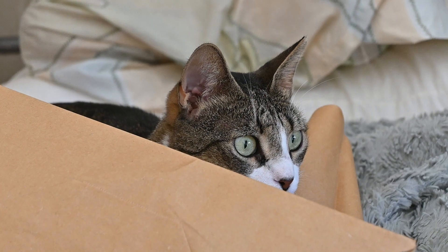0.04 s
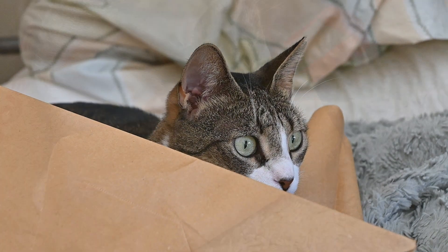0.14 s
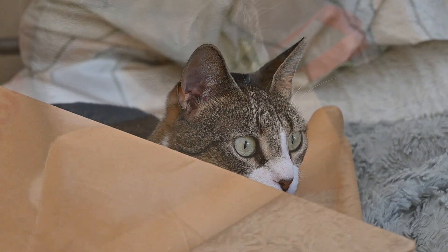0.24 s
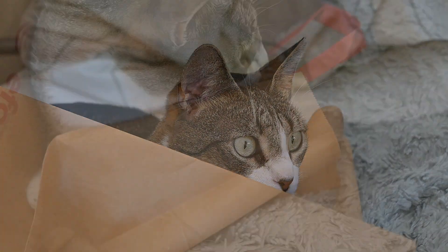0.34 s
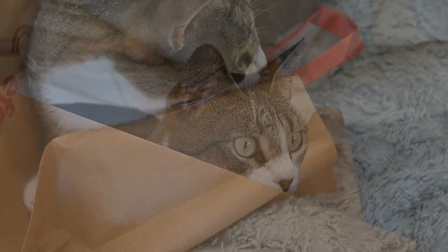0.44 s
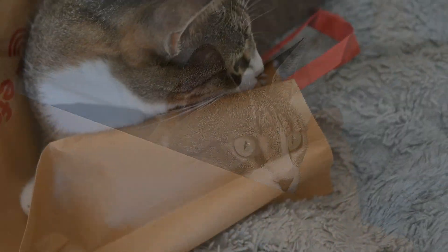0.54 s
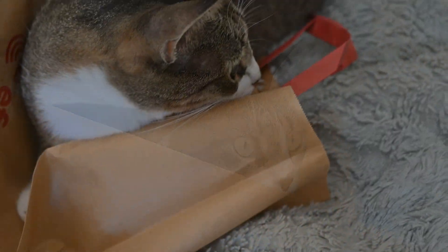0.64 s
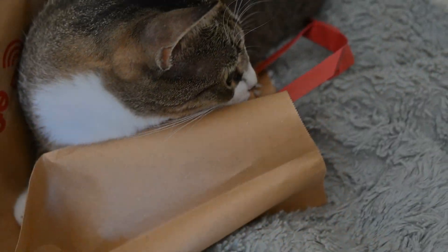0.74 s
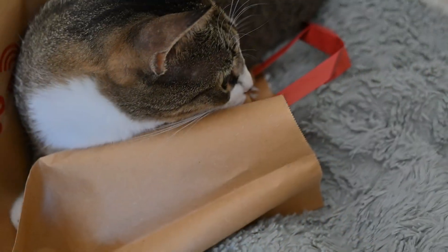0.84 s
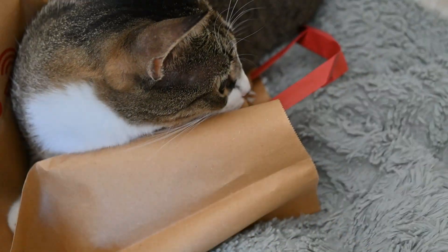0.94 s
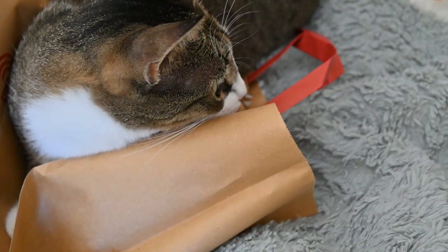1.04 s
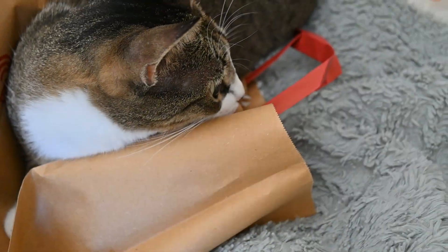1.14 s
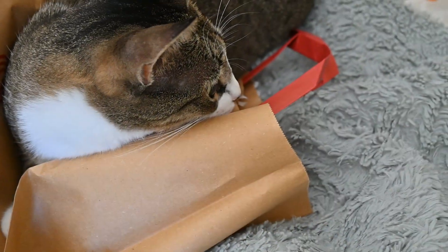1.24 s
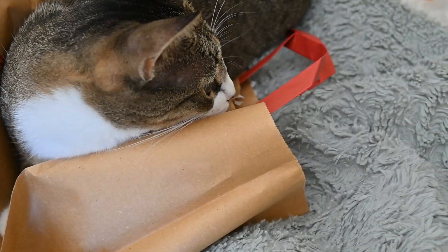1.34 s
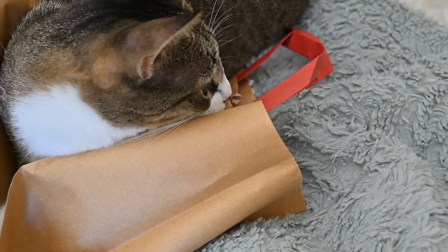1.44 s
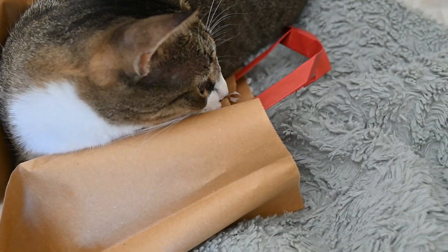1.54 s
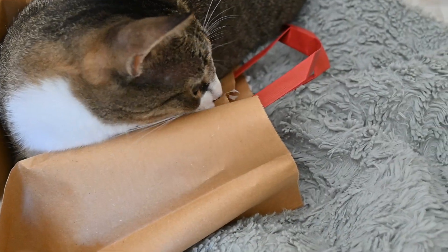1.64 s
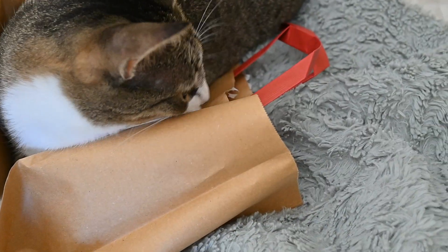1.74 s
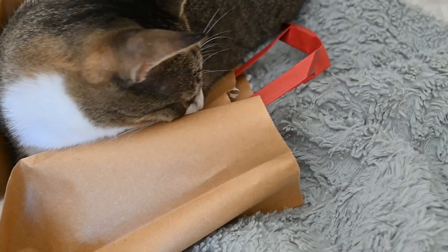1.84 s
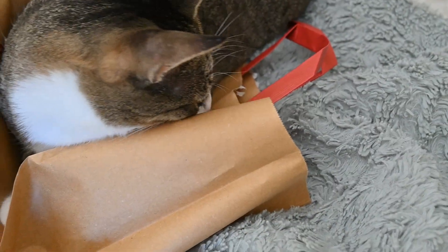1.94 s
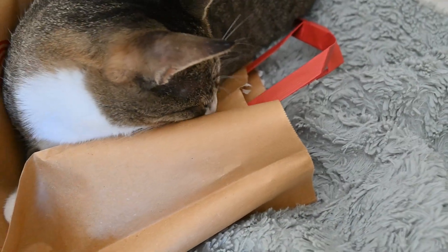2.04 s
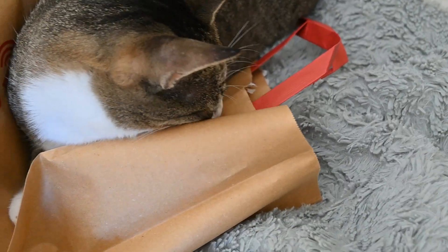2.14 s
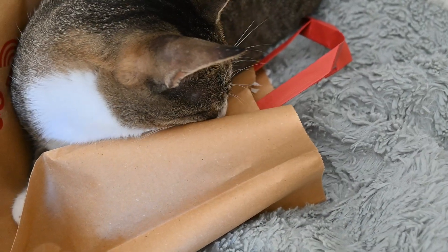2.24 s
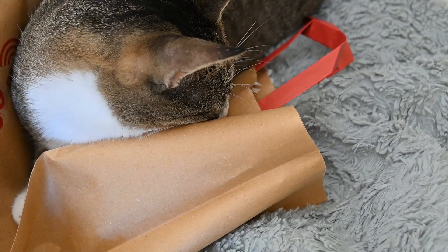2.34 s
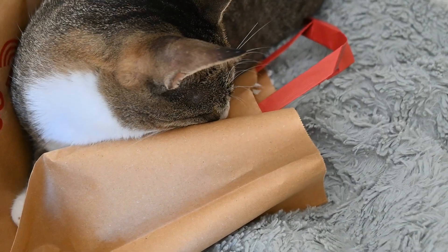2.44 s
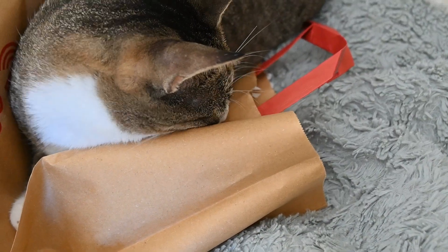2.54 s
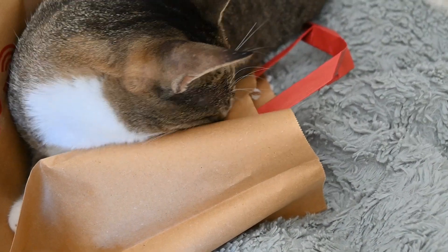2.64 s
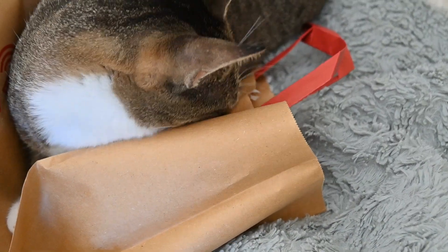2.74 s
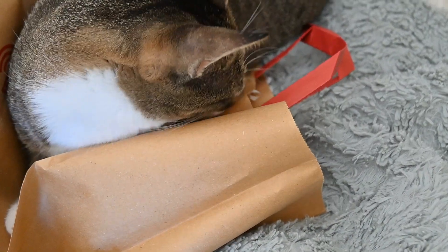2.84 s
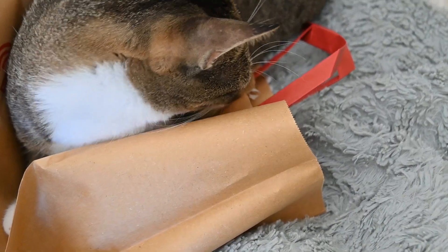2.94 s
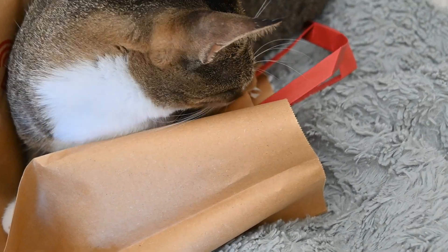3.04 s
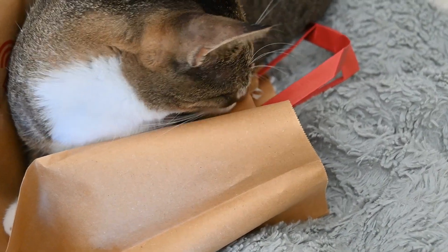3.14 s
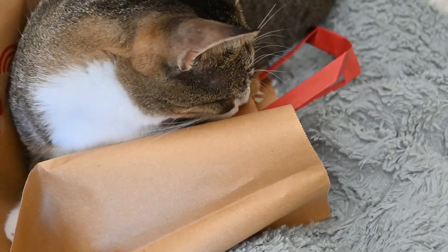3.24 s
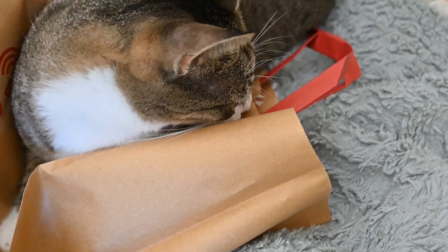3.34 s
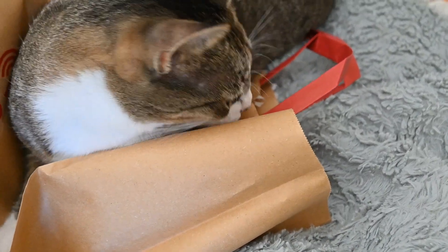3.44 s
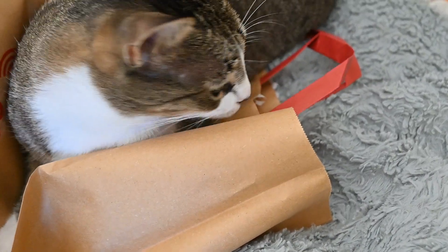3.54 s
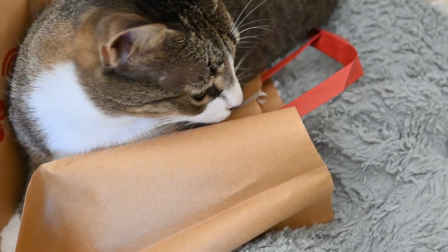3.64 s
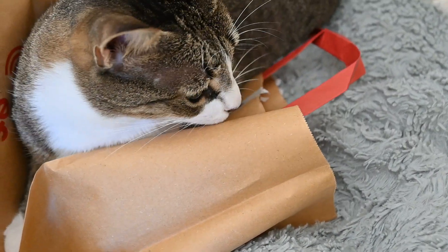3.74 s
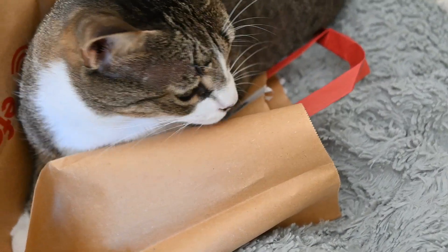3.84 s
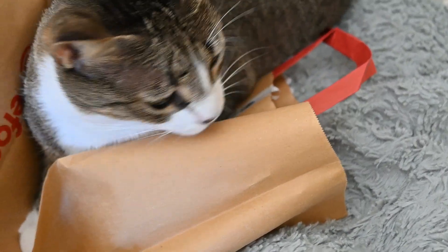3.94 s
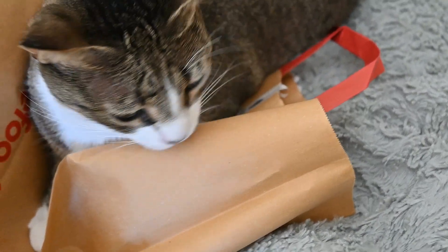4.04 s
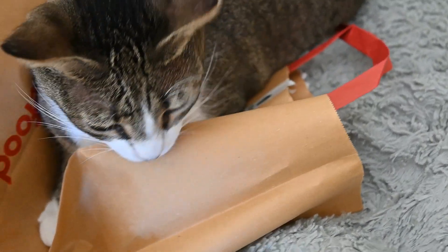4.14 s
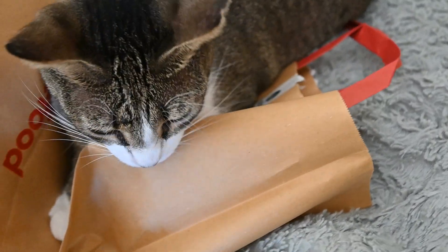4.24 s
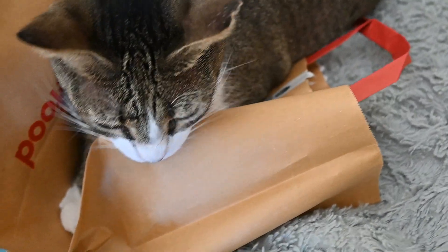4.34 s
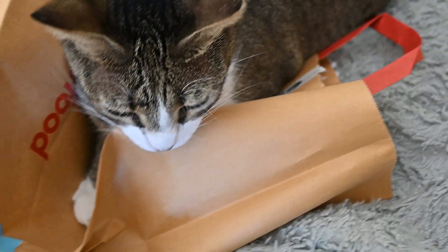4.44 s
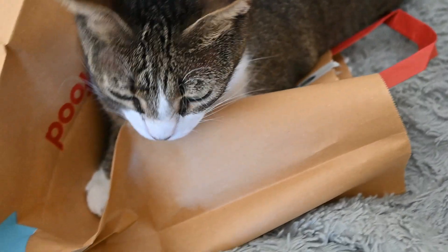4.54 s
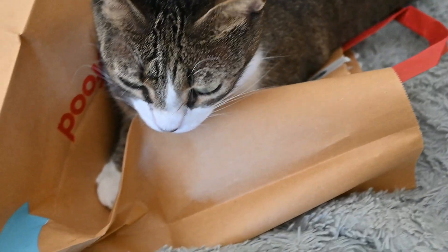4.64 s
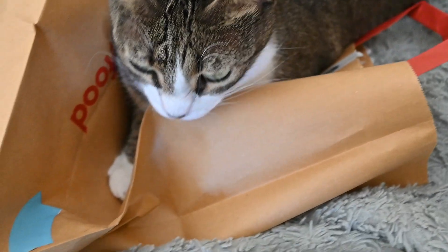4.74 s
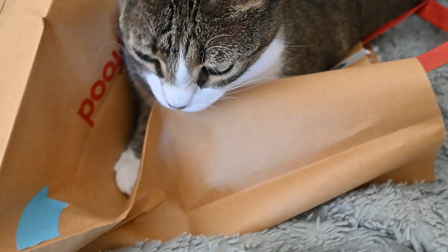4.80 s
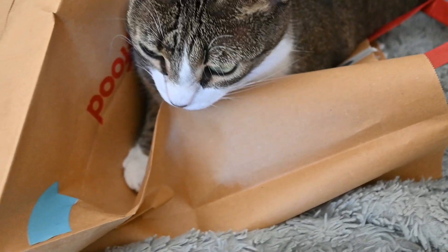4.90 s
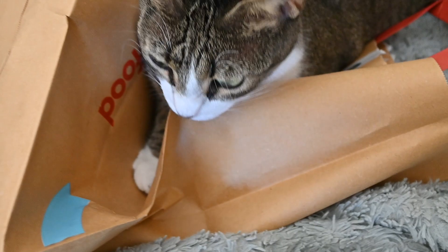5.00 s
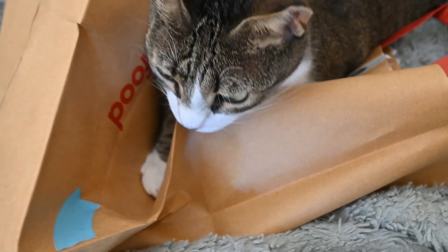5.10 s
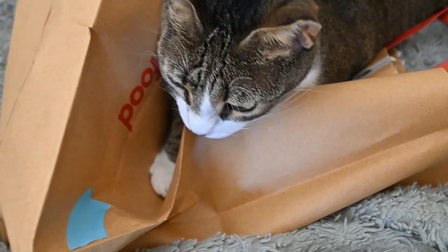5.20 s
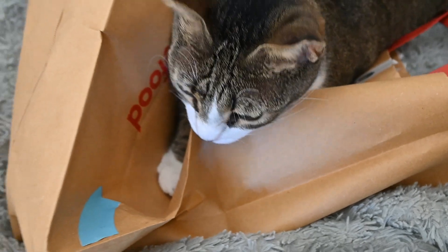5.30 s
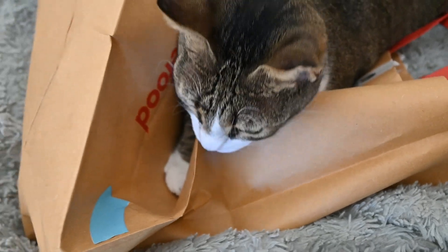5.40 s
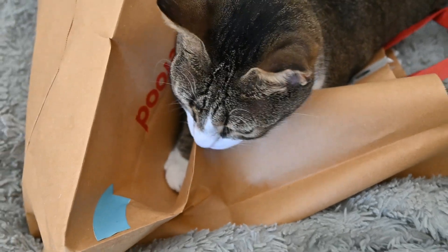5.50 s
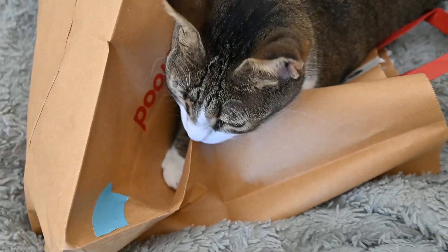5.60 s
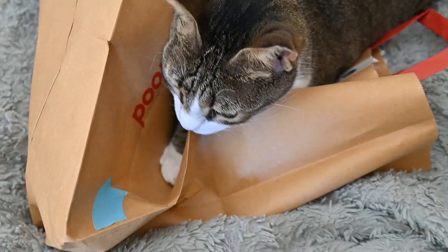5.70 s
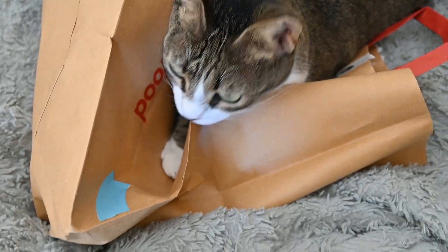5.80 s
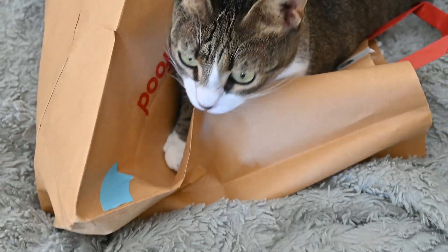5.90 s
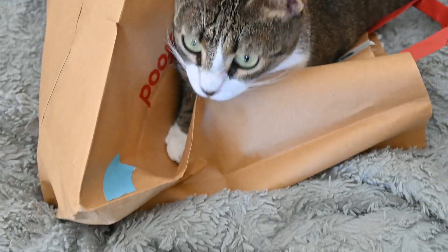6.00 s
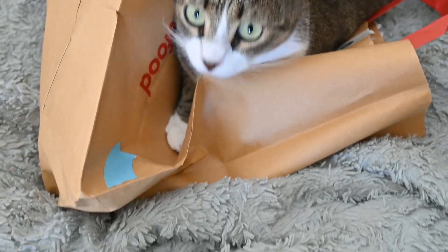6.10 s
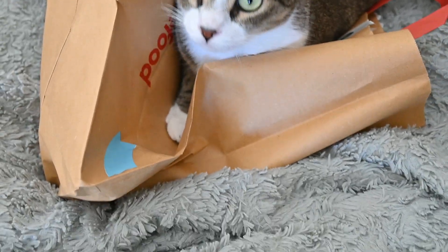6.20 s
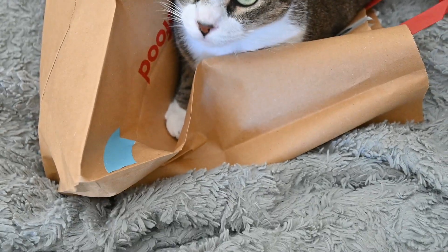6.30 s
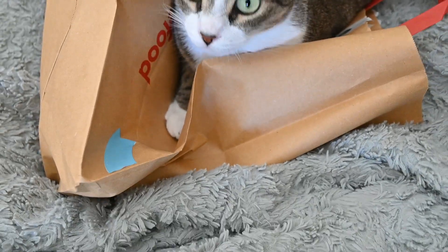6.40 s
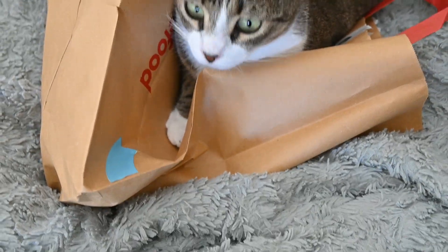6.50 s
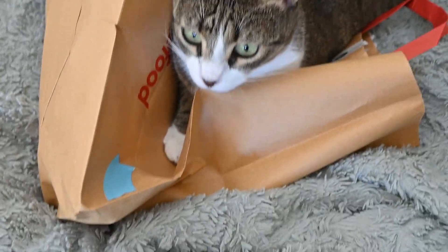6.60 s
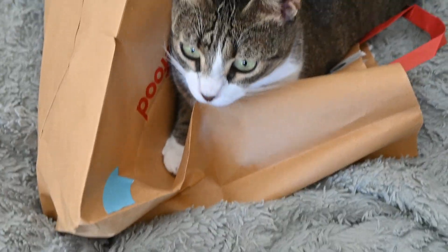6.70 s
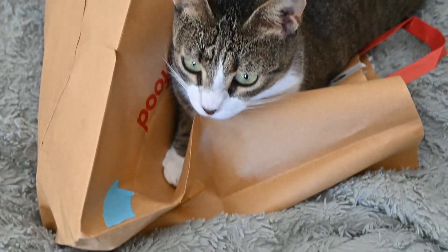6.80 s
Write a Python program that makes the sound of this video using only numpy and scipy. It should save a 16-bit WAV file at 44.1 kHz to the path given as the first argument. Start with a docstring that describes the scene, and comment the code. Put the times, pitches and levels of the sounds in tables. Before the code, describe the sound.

Close to a small camera's microphones, a paper bag on a thick blanket rustles softly, then buckles with irregular dry snaps and papery scraping. The loudest crackling comes just past the middle, with a dull thump of air in the bag. It thins to isolated ticks; a faint low house hum grows beneath steady hiss in the quiet room.

```python
"""Fur slides softly on paper at first; throughout, a low rumble, a faint hum that grows towards the end, and
capsule hiss. A cat shifts its weight on a stiff paper bag on a thick blanket, in a quiet, dry room, close to
the two capsules of a small camera. Creases buckle with snaps and dull pops: noise and kicks through resonances,
with a short room tail. The rustle is coloured, grainy noise that follows each stroke; the bag's air thumps as
filtered pulses. A brief thin whistle is narrow-band noise; rumble and hiss are shaped noise, the hum sines."""
import sys
import numpy as np
from scipy import signal
from scipy.fft import rfft, irfft, next_fast_len
from scipy.io import wavfile
from scipy.ndimage import uniform_filter1d, map_coordinates

SR = 44100
rng = np.random.default_rng(int(sys.argv[2]) if len(sys.argv) > 2 else 0)


def transcribe(u):
    """Save the signal u as a 16-bit wav file named by the first command-line argument.

    u: samples, shape (n,) or (channels, n), limited to [-1, 1]; the rate is SR.
    q: integer samples, one column per channel.
    """
    v = np.clip(np.atleast_2d(u).T, -1, 1)
    q = np.round(v * 32767).astype(np.int16)
    wavfile.write(sys.argv[1], SR, q)


N = 302305

# Deep rumble and low murmur of the house: start_s, rumble_db, murmur_db
ROOM_LEVELS = [(0, -72, -70.5), (.5, -69, -70), (1.6, -73.5, -77), (2.5, -71, -71), (4.2, -71, -65),
               (4.7, -63, -65.5), (5.3, -65.5, -65.5), (6.85, -63, -69.5)]
# Spectrum of the deep rumble: frequency_hz, relative_level_db per Hz
RUMBLE_SPECTRUM = [(8, -9.5), (15, 2.5), (22, 1.5), (32, 0.5), (45, -19), (60, -49.5)]
# Spectrum of the house murmur: frequency_hz, relative_level_db per Hz
MURMUR_SPECTRUM = [(35, -29.5), (55, -5.5), (85, -15), (125, -4.5), (150, -2.5), (200, -5.5), (260, -4.5),
                   (400, -17), (800, -89.5)]
# Wavering hums: pitch_hz, early_level_db, late_level_db
HUMS = [(58.2, -79, -74), (137, -82, -74.5), (160.4, -79, -70.5), (213.5, -80, -71)]
# Mains tone near 100 Hz: start_s, level_db
MAINS_LEVELS = [(0, -71.5), (.5, -71.5), (1.6, -74.5), (2.5, -74), (6.85, -74.5)]
# Hiss in each channel, louder for the first 0.8 s or so: start_s, level_db
HISS_LEVELS = [(0, -68.5), (.75, -65), (.85, -73.5), (6.85, -71)]
# Spectrum of the hiss: frequency_hz, relative_level_db per Hz
HISS_SPECTRUM = [(59, -26), (100, 2.5), (163, 3), (659, 1.5), (1030, -2), (1710, -4), (2250, -4.5),
                 (3740, -3), (14800, -1), (15800, -4), (16100, -55)]
# Strokes of fur along the paper: peak_s, scraping_db, fur_over_scraping_db, walls_over_scraping_db,
# rise_s per 10 dB, fall_s per 10 dB (signs of the last two are ignored)
STROKES = [(.085, -69, 1.5, 2, -0.02, 0.56), (.55, -70, -7, 1.5, 0.4, -0.03), (.77, -73, 1.5, 6, .3, -0.22),
           (.98, -76, 1, -0.5, 0.12, 0.2), (1.45, -69, 3.5, -4, .1, 0.1), (1.56, -65, 3, -6, 0.01, 0.1),
           (1.65, -58, 5.5, -7, .07, 0.18), (1.75, -58, 7, -5, 0.09, 0.12),
           (1.81, -51, 1, 2.5, -0.0065, 0.08), (1.92, -63, 3.5, 3.5, 0, 0.08),
           (2.075, -52, -1, -4, 0.0549, 0.06), (2.19, -60, -2.5, -6, 0.17, 0.12),
           (2.44, -65, -4, -8, 0.1, .1), (2.575, -57.5, 3, -2.5, -0.03, 0.33),
           (2.68, -60, 4, 4.5, -0.01, 0.33), (2.87, -63, 1, -2.5, 0.15, 0.31), (3.04, -64, -6, 1, .15, 0.1),
           (3.29, -58, 1.5, 0, 0.03, 0.1039), (3.35, -47.5, 0.5, -6, 0.0656, 0.09),
           (3.47, -62, 4, 2, 0.18, 0.1), (3.61, -54, 1.5, 4, -0.06, 0.13),
           (3.66, -49, -2.5, 6.5, 0.03, 0.095), (3.71, -45, -8, -4, 0.03, 0.0558),
           (3.75, -52, 3.5, -3.5, 0.02, .06), (3.79, -45, -3, -6, 0.0338, 0.0974),
           (3.885, -51, 2.5, -5, 0.0853, -0.06), (4.08, -63, -1.5, 7, 0.0841, .1),
           (4.15, -49, -1.5, -3, .02, 0.02), (4.2, -39, -4.5, -8, .04, 0.0417),
           (4.33, -49, 0, 0.5, .05, 0.1), (4.42, -44.5, -7.5, -6, 0.124, 0.0563),
           (4.69, -60, -1.5, -6, .06, 0.03), (4.83, -61, 0, -6, 0.2, 0.077),
           (5.05, -58, -1.5, -4, 0.1921, 0.04), (5.2, -58.5, -5, -1, 0.18, 0.09),
           (5.47, -65, 3, 0.5, 0.4, 0.25), (5.79, -70, -0.5, -2, 0.03, 0.35),
           (6.11, -67, 0.5, 3, -0.27, 0.25)]
# Levels while the cat lies still: walls_db, scraping_db, fur_db
REST_LEVELS = (-68, -75, -75.5)
# Spectrum of the shaking bag walls: frequency_hz, relative_level_db per Hz
WALL_SPECTRUM = [(90, -19), (200, 2.5), (400, 4.5), (900, 2.5), (1500, -2), (3000, -17.5), (8000, -86)]
# Spectrum of the scraped paper: frequency_hz, relative_level_db per Hz
SCRAPE_SPECTRUM = [(500, -68), (1000, 0), (1600, -0.5), (2600, 0), (4200, -6), (6000, -15), (12000, -59.5)]
# Spectrum of the sliding fur: frequency_hz, relative_level_db per Hz
FUR_SPECTRUM = [(1500, -45), (3500, -4), (5800, 1.5), (7300, -1), (9000, 1), (10700, -5.5), (13000, -5.5),
                (15300, -8), (15850, -28), (16100, -57)]
# Buckling creases: start_s, body_level_db, boom_over_body_db, tilt_db (body to crack, again to sizzle),
# body_pitch_hz, length (a factor that slows the onset and the decays)
SNAPS = [(0.8059, -55.5, -13, -13.5, 1590, 1.17), (0.8735, -67.5, 6, -10, 1050, 1),
         (1.3125, -66, -4, -9, 1430, 1.5), (1.5047, -59, -24, -15.5, 1600, 0.87),
         (1.643, -62, -16, 3, 1300, .94), (1.788, -58, 12, 2, 840, 1.25),
         (1.7995, -27.5, -6.5, -18.5, 1130, 0.64), (1.8258, -53, -6, 3, 1220, 2.1),
         (1.83, -39, 4.5, -15.5, 1310, 1.9), (1.8672, -65, 13, 7, 1320, 0.99),
         (1.8878, -38, -1.5, -16.5, 1000, 1.5), (1.9634, -57, -1, -3, 1740, 1.9),
         (2.0029, -55, 0, -5, 1880, 2.2), (2.0227, -65, 14, 1, 1090, 1.7), (2.044, -51, 2, -6, 1840, 2.68),
         (2.0713, -53, 3, -5.5, 1940, 1.94), (2.135, -42, 1, -12.5, 1016, 1.55),
         (2.15, -76, 9.5, 8.5, 1130, .5), (2.3723, -74.5, 5, 3.5, 1410, 1.6),
         (2.385, -72, -3, 2, 1690, 1.5), (2.31, -67.5, -6, 2.5, 1610, 1.1),
         (2.6453, -47.5, -9.5, -6, 1730, 1.7), (2.7288, -48.5, 3, -21, 1092, 2.36),
         (2.751, -50, -7.5, -9, 1210, 1.2), (2.7773, -38.5, -1, -8, 1186, 1.4),
         (2.9111, -59, -13.5, 2.5, 1380, 0.96), (2.9603, -57, -12, -12, 1520, 1),
         (2.9908, -54, -9, 1.5, 1530, 1.58), (3.0355, -53, -5.5, -0.5, 1710, 1.1),
         (3.2902, -46.5, -1.5, -9, 1290, 2.96), (3.3383, -38, -7, -11.5, 1222, 1.74),
         (3.353, -47, -0.5, -13, 1290, 1.02), (3.362, -47, -0.5, -14, 1190, 1.43),
         (3.402, -37, -25, -15.5, 1060, 0.54), (3.4086, -37, -4, -4.5, 1000, 1.7),
         (3.463, -76, 5, 9, 1200, 1), (3.476, -76.5, 7, 10, 1200, 1.5), (3.5413, -53.5, 3, -14, 1230, 0.98),
         (3.6145, -45, 1.5, -10, 1640, 1.3), (3.6276, -27.5, -12, -15.5, 1460, 1.4),
         (3.6341, -33.5, -25, -12, 1186, 0.75), (3.6514, -19, -5.5, -2.5, 1600, 1.33),
         (3.662, -21.5, -5.5, -12.5, 930, 1.53), (3.8004, -38, -23.5, -6, 1810, 1.4),
         (3.828, -41.5, -16, -8, 1280, 0.81), (3.873, -40.5, -18, -0.5, 1245, 2.6),
         (3.8802, -55.5, 11, 4, 1315, 1.64), (3.8883, -30.5, -4.5, -7, 1430, 1.37),
         (3.9647, -56, -13, -10, 1010, .6), (3.9853, -47.5, -2.5, -12, 1290, 2.2),
         (4.0412, -38.5, -2.5, -15, 1200, 1.7), (4.05, -47, 0, -14, 1110, 1.5),
         (4.0755, -48, 1, -9, 1150, 0.38), (4.091, -59.5, 15, -4, 790, 2.46),
         (4.1121, -56, -0.5, -4.5, 1010, 1.2), (4.1354, -42, 1, -12, 770, 2),
         (4.1462, -56, 2.5, 2.5, 1130, 1.12), (4.1665, -47, -6.5, -7, 1510, .86),
         (4.1816, -20, -10, -0.5, 1670, 1.14), (4.201, -48, -6.5, -2, 1570, 1.4),
         (4.237, -35.5, -9, -6, 1080, 1.1), (4.2852, -38.5, -3.5, -11, 1020, 1.1),
         (4.3088, -25.5, -16, 0, 1750, 1.225), (4.3218, -43.5, -11, 0, 1200, 1.6),
         (4.3632, -34, -16.5, -12, 1080, 0.8), (4.3687, -32, -9, -5.5, 1650, 1.3),
         (4.3895, -33.5, -10.5, 3, 1370, 1.26), (4.4181, -26, -5, -6.5, 1500, 0.89),
         (4.4632, -45, 0, -17, 800, 1.68), (4.5903, -33.5, -2, -19.5, 1100, 1.91),
         (4.6393, -47.5, -4, -10.5, 1660, .8), (4.6737, -58, 2.5, 4, 1540, 5.3),
         (4.8431, -54.5, 3, -2, 1330, 0.97), (4.9877, -49, -13, -15, 1090, 3.13),
         (5.0227, -33, -10, -9, 1860, 0.77), (5.0696, -52, -16, -10.5, 1210, 1.96),
         (5.1092, -42.5, -5.5, -25.5, 770, 1.9), (5.1181, -55.5, 9, -10, 825, 1.34),
         (5.187, -35, -2.5, -10, 1390, 1.6), (5.239, -50, 0, -10, 1020, 1.32),
         (5.46, -68.5, 11, 1, 1560, 2.8), (5.6029, -70.5, 8, 1, 1151, 2.8),
         (5.7783, -76.5, 17.5, -2, 1070, 1.9), (5.8178, -73, 14, -2, 1023, 2.3),
         (5.5354, -63.5, 0, -6, 1580, 1.37), (5.7366, -64, 1, 0, 1510, 1.3),
         (5.7984, -65, -5, -1, 1464, 3.28), (6.0733, -60, -14, -5, 1575, 1.3),
         (6.0956, -59, 5.5, -3, 1061, 2.1), (6.2271, -59, -7, -15.5, 1470, 1.04),
         (6.3181, -54, -2, -19, 720, 1.05), (6.6138, -53, -8.5, -7.5, 1642, 1.3)]
# Boom, body, crack, sizzle of a crease: width_over_centre (ratio), t60_s at length 1,
# kick_over_shaking (ratio at length 1)
SNAP_PARTS = [(1.7, .031, 1.9), (1.35, 0.016, 1.2), (1.25, .011, 3.2), (1.7, 0.0087, 3.9)]
# Ringing of the bag: pitch_hz, width_hz, level_db over the plain sheet
BAG_RESONANCES = [(405.6, 350, -0.5), (690, 180, 2), (1390, 45, -13.5), (2030, 360, -6), (2900, 860, -7),
                  (4670, 69, -14.5), (5670, 610, -8), (8125, 1600, 8), (14400, 800, 1)]
# Decay of the furnished room: frequency_hz, t60_s
ROOM_DECAY = [(300, 0.12), (2000, 0.088), (12000, 0.13)]
# A wall flips and pumps the air in the bag: start_s, level_db (rms over 10 ms)
THUMPS = [(1.799, -63), (2.73, -54), (3.652, -36.5), (4.18, -54.5), (4.289, -54.5), (5.19, -58)]
# Faint narrow whistles: pitch_hz, start_s, end_s, peak_level_db
WHISTLES = [(3000, 2.16, 2.51, -74), (3530, 2.2, 2.41, -71.5)]

BOOM_HZ, CRACK_HZ, SIZZLE_HZ = 455.7, 3500, 8020
CRACK_LIFT_DB = 2.5  # the crack stands this far over the tilt
DULL_LOSS = .4  # a dull snap loses this share of its tilt once more in the sizzle
TICK_COUNT = 24
TICK_DB, TICK_SPREAD_DB = -4.5, 3  # small chance creases, over the scraping of their moment
RATTLE_DB, RATTLE_T60_S = -12, .25  # the walls rattle on, starting this far from each boom's level
ROOM_DB = -17  # room tail against the direct creases
TOP_HZ = 16900  # highest frequency kept


def amp(db):
    """Gain of a level."""
    return 10 ** (np.asarray(db) / 20)


def unit(x):
    """x at rms 1."""
    return x / np.sqrt(np.mean(x ** 2, axis=-1, keepdims=True) + 1e-20)


def along(points, hz):
    """(Hz, value) points read on a log frequency axis."""
    f, v = np.transpose(points)
    return np.interp(np.log(hz + 1), np.log(f + 1), v)


def curves(rows):
    """One value per sample for each column after the time."""
    s, *cols = np.transpose(rows)
    return [np.interp(np.arange(N) / SR, s, c) for c in cols]


def wobble(rate):
    """A smooth random curve with rate knots a second."""
    knots = rng.standard_normal(int(N * rate / SR) + 4)
    return map_coordinates(knots, [np.arange(N) * rate / SR])


def filtered(x, response):
    """x times a complex response of frequency."""
    n = x.shape[-1]
    m = next_fast_len(n + 8192)  # padding keeps the ringing from wrapping round
    return irfft(rfft(x, m) * response(np.fft.rfftfreq(m, 1 / SR)), m)[..., :n]


def resonance(f, hz, width_hz):
    """One causal resonance with a peak gain of 1."""
    return 1j * f * width_hz / (hz * hz - f * f + 1j * f * width_hz + 1e-9)


def coloured(x, spectrum):
    """x through a spectrum of (Hz, dB) points, rms 1."""
    return unit(filtered(x, lambda f: amp(along(spectrum, f))))


def house():
    """Rumble, murmur and a wavering mains tone with one overtone, under hums that grow towards the end."""
    rumble_db, murmur_db = curves(ROOM_LEVELS)
    t = np.arange(N) / SR
    rumble = coloured(rng.standard_normal(N), RUMBLE_SPECTRUM) * amp(rumble_db + 1.9 * wobble(3.6))
    murmur = coloured(rng.standard_normal(N), MURMUR_SPECTRUM) * amp(murmur_db + 1.3 * wobble(3))
    late = np.interp(t, (4.2, 5.3), (0, 1))
    hum = np.zeros(N)
    for hz, early_db, late_db in HUMS:
        level_db = early_db + late * (late_db - early_db) + 2.5 * wobble(5)
        phase_drift = 1.2 * wobble(3)
        hum += amp(level_db) * unit(np.sin(2 * np.pi * hz * t + phase_drift))
    phase = 2 * np.pi * 100.1 * t + .3 * wobble(2.4)
    mains = unit(np.sin(phase) + .4 * np.sin(2 * phase))
    mains = mains * amp(curves(MAINS_LEVELS)[0] + 1.8 * wobble(5))
    return rumble + murmur + hum + mains


def together(levels_db, rest_db):
    """Level of several sounds at once over a resting level, their powers added."""
    return 10 * np.log10(np.sum(amp(levels_db) ** 2, axis=0) + amp(rest_db) ** 2)


def strokes():
    """Levels of walls, scraping and fur: each stroke swells and fades; booms leave the walls rattling."""
    t = np.arange(0, N / SR + .01, .002)
    peak_s, peak_db, fur_db, wall_db, rise, fall = np.transpose(STROKES)[..., None]
    before, after = (peak_s - t) / abs(rise), (t - peak_s) / abs(fall)
    scrape_db = peak_db - 10 * np.where(t < peak_s, before, after)
    snap_s, body_db, boom_db = np.transpose(SNAPS)[:3, :, None]
    rattle_db = body_db + boom_db + RATTLE_DB - 60 * (t - snap_s) / RATTLE_T60_S
    rattle_db = np.where(t < snap_s, -200, rattle_db)
    layers = np.vstack([scrape_db + wall_db, rattle_db]), scrape_db, scrape_db + fur_db
    levels = [together(db, rest_db) for db, rest_db in zip(layers, REST_LEVELS)]
    return curves(np.transpose([t] + levels))


def grainy(level_db, per_second, spread_db, life_s, share):
    """Noise plus tiny stick-slip bursts of unequal size; a light touch slides smoothly, a firm one crackles."""
    sizes = amp(spread_db * np.minimum(rng.exponential(size=N), 3)) ** 2
    slips = (rng.random(N) < per_second / SR) * sizes
    power = signal.lfilter([1], [1, -np.exp(-1 / (life_s * SR))], slips)
    # all smooth up to -68 dB, the full share of bursts from -56 dB
    share = share * np.clip((level_db + 68) / 12, 0, 1)
    return rng.standard_normal(N) * np.sqrt(1 - share + share * power / power.mean())


def patchy(x, depth_db):
    """Random gain patches, a few hundred Hz wide and some 30 ms long: each fold resonates on its own."""
    z = signal.stft(x, nperseg=256)[2]
    field = uniform_filter1d(rng.standard_normal(z.shape), size=3, axis=0)
    field = uniform_filter1d(field, size=10, axis=1)
    return signal.istft(z * amp(depth_db * field / field.std()), nperseg=256)[1][:N]


def rustle():
    """Sliding fur shakes and scrapes the paper and hisses; all flutter as the pressure changes."""
    wall_db, scrape_db, fur_db = strokes()
    pressure = wobble(35)
    wall = patchy(grainy(wall_db, 210, 5, 0.004, 0.19), 2.3)
    wall = coloured(wall, WALL_SPECTRUM) * amp(wall_db + 0.68 * pressure)
    scrape = patchy(grainy(scrape_db, 350, 4.7, .002, 0.13), 1.6)
    scrape = coloured(scrape, SCRAPE_SPECTRUM) * amp(scrape_db + 1.05 * pressure)
    fur = patchy(grainy(fur_db, 300, 4, .001, 0.23), 1.3)
    fur = coloured(fur, FUR_SPECTRUM) * amp(fur_db + pressure)
    return wall + scrape + fur


def ticks():
    """Small creases in the columns of SNAPS, falling more often where the scraping is firm."""
    scrape_db = strokes()[1]
    chance = np.cumsum(amp(scrape_db / 2))
    u, z = rng.random((TICK_COUNT, 3)), rng.standard_normal((TICK_COUNT, 3))
    at = np.searchsorted(chance / chance[-1], u[:, 0])
    body_db = scrape_db[at] + TICK_DB + TICK_SPREAD_DB * z[:, 0]
    boom_db, tilt_db = 7 * z[:, 1], -6 + 5 * z[:, 2]
    body_hz, length = 900 + 900 * u[:, 1], 0.71 + 1.5 * u[:, 2]
    return np.transpose([at / SR, body_db, boom_db, tilt_db, body_hz, length])


def bag(f):
    """The plain sheet plus the resonances with which the bag rings."""
    return 1 + sum(amp(db) * resonance(f, hz, width_hz) for hz, width_hz, db in BAG_RESONANCES)


def snaps():
    """Each buckling crease kicks the sheet and shakes it: the treble dies fast, the boom lingers."""
    out, t = np.zeros(N + SR), np.arange(SR // 8) / SR
    rows = np.vstack([SNAPS, ticks()])
    for s, body_db, boom_db, tilt_db, body_hz, length in rows:
        crack_db = tilt_db + CRACK_LIFT_DB
        sizzle_db = 2 * tilt_db + DULL_LOSS * min(tilt_db, 0)
        levels_db = body_db + np.array([boom_db, 0, crack_db, sizzle_db])
        centres_hz = BOOM_HZ, body_hz, CRACK_HZ, SIZZLE_HZ
        for db, hz, (wide, t60, kick) in zip(levels_db, centres_hz, SNAP_PARTS):
            fall_db = -60 * t / (t60 * length ** .5)
            decay = amp(fall_db) + 0.05 * amp(fall_db / 2.5)  # with a faint slower tail
            onset = 1 - np.exp(-t / (0.00014 * length ** 2))
            x = rng.standard_normal(len(t)) * decay * onset
            # short snaps start with one clean kick
            x = x - kick / length ** 2 * np.sqrt(SR / hz) * (t == 0)
            x = filtered(x, lambda f: resonance(f, hz, wide * hz) ** 4 * bag(f))
            level = amp(db) * np.sqrt(SR / 100 / np.sum(x ** 2))  # level = rms over 10 ms
            out[round(s * SR):][:len(t)] += level * x
    return out[:N]


def room(x):
    """A short soft-furnished tail of decaying noise, 2 ms behind, drawn anew every quarter second."""
    out, step = np.zeros(N + SR), SR // 4
    for start in range(0, N, step):
        hz, t, z = signal.stft(rng.standard_normal(step), SR, nperseg=128)
        decay = amp(-60 * t / along(ROOM_DECAY, hz)[:, None])
        tail = signal.istft(z * decay, SR, nperseg=128)[1]
        wet = signal.fftconvolve(x[start:start + step], tail / np.linalg.norm(tail))
        out[start + 90:][:len(wet)] += wet
    return out[:N]


def thumps():
    """Each flip of a wall gives one soft low swing of the air in the bag."""
    pushes = np.zeros(N)
    for s, db in THUMPS:
        pushes[round(s * SR)] = amp(db)

    def swing(f):
        """Three equal low resonances in a row."""
        return resonance(f, 130, 210) ** 3

    one_swing = filtered(np.arange(SR) == 0, swing)
    return filtered(pushes, swing) * np.sqrt(SR / 100) / np.linalg.norm(one_swing)


def whistles():
    """Narrow bands of noise that swell and fade."""
    t = np.arange(N) / SR
    out = np.zeros(N)
    for hz, start, end, db in WHISTLES:
        swell = np.sin(np.pi * np.clip((t - start) / (end - start), 0, 1))
        band = filtered(rng.standard_normal(N), lambda f: resonance(f, hz, 70) ** 2)
        out += amp(db) * swell * unit(band)
    return out


def scene():
    """House, rustle, creases with their room tail, thumps and whistles reach both capsules alike."""
    creases = snaps()
    sound = house() + rustle() + creases + amp(ROOM_DB) * room(creases) + thumps() + whistles()
    return np.array([sound, sound])


def record(dry):
    """Each capsule adds its own hiss, and a louder hiss fills the first 0.8 s or so; nothing sounds above
    TOP_HZ."""
    hiss = amp(curves(HISS_LEVELS)[0]) * coloured(rng.standard_normal(dry.shape), HISS_SPECTRUM)
    return filtered(dry + hiss, lambda f: f < TOP_HZ)


dry = scene()
out = record(dry)
transcribe(out)
```